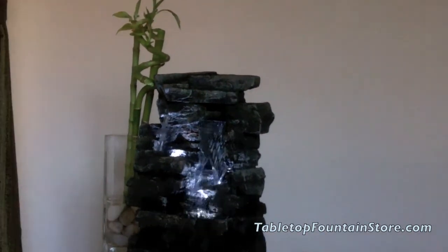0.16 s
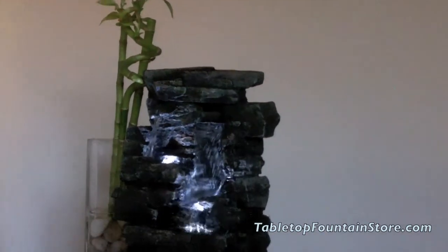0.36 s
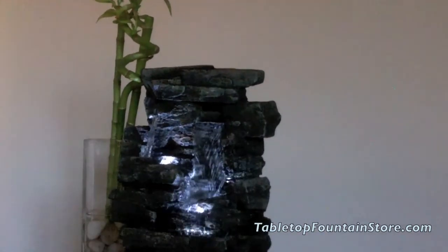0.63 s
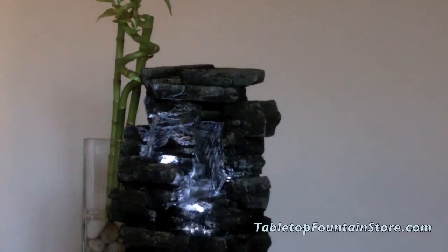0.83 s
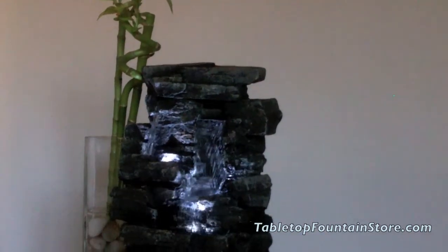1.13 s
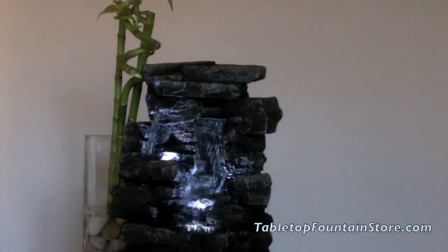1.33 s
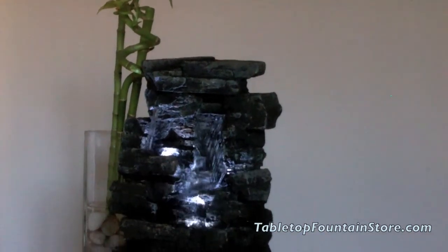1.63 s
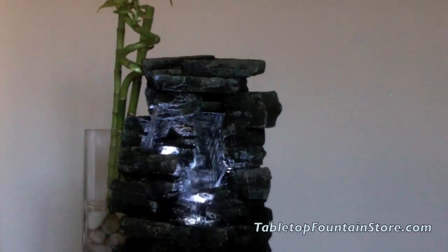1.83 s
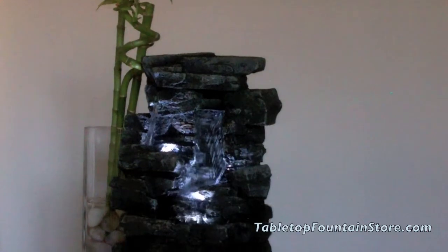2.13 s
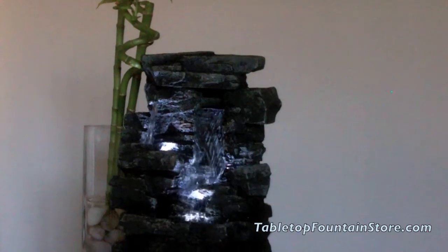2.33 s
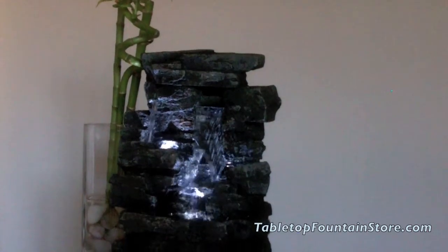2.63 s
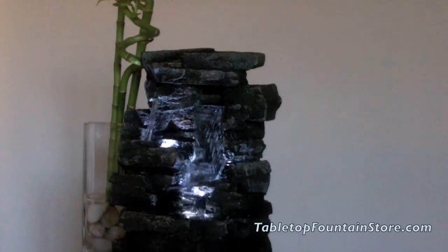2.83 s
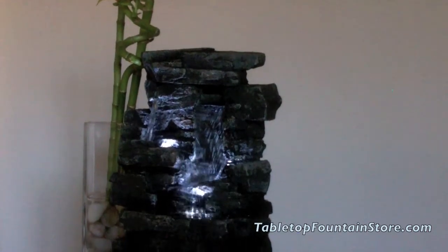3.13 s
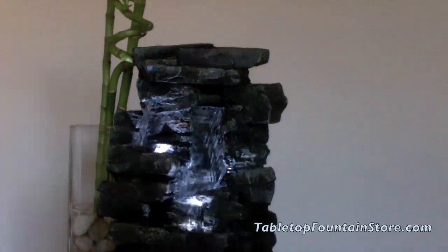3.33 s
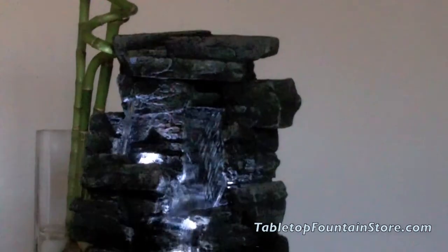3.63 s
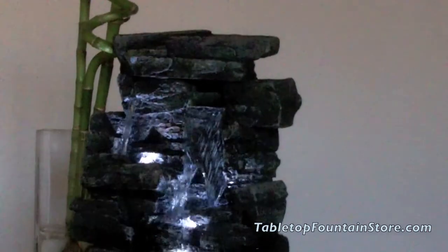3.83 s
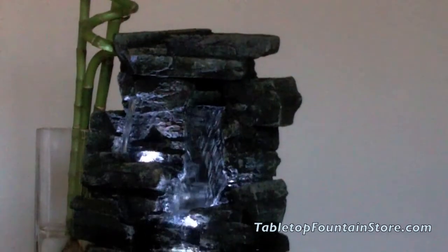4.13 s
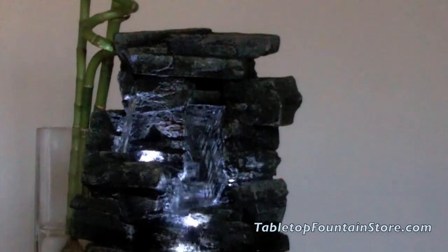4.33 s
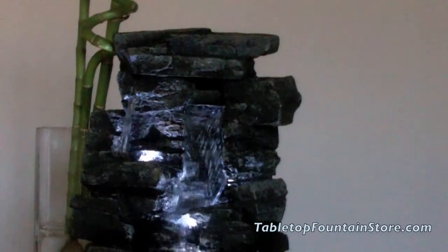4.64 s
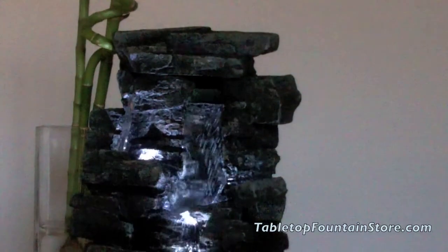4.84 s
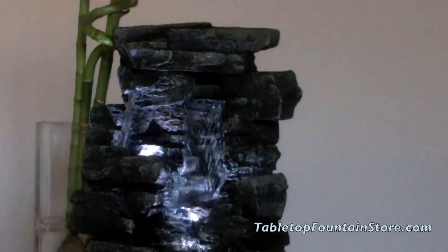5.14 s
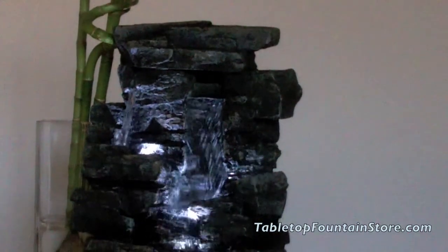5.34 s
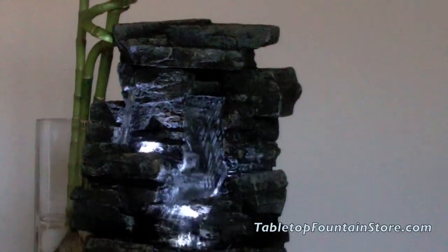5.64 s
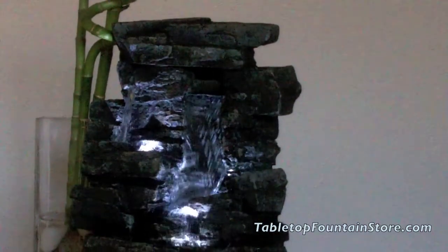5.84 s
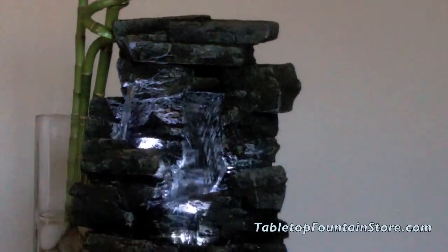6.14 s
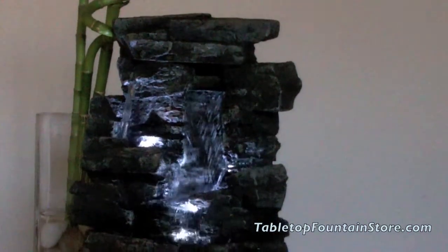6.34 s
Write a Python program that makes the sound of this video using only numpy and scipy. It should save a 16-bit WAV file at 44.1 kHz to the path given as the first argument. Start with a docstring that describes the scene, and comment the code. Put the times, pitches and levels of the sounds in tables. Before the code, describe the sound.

A small stone tabletop fountain is already running in a quiet room, heard close, centred and almost mono, with a faint short room tail. A soft, continuous trickle of small gurgles and fine fizz sits over a deep pump hum whose throb is strong at first, dips near 0.8 s, then swells and fades repeatedly. Drops plop with round, hollow tones and high droplets tick on wet stone throughout. A short splash comes around 0.2 s, a weak one at 1.0, a livelier, crisper cluster from 2.2 to 2.8, then frequent bubbly splashes from 3.3 to 5.4. Dry plastic handling knocks cut in close to the microphone: a faint one at 0.55, a solid thump at 1.7, a short click at 3.2, a duller knock at 3.7 and a hard double knock at 5.6. Afterwards calmer trickling and hum continue until the end, without resolving.

```python
"""From the start a small tabletop fountain trickles down stone tiers in a quiet room, over its pump's hum.
The film of water is clouds of ringing bubbles on noise; the pump is sines, its deep throb swelling and fading.
Drops plop and droplets spatter at once: bubble tones behind bursts of noise. Short splashes of bubbles and
spray come before 0.3 s, at 1 s, from 2.2 to 2.8 s and from 3.3 to 5.4 s. Dry knocks, as of a plastic housing
being handled, sound close by from 0.5 s on (noise cracks and modes); the last two come together near 5.6 s."""
import sys
import numpy as np
from scipy import signal
from scipy.fft import rfft, irfft
from scipy.io import wavfile

SR = 44100
rng = np.random.default_rng(int(sys.argv[2]) if len(sys.argv) > 2 else 0)


def master_out(mix):
    """Clip the mix to full scale and print it as 16-bit PCM to the path in sys.argv[1]."""
    frames = np.transpose(np.atleast_2d(mix))
    ceiling = np.clip(frames, -1, 1)
    pcm = np.round(ceiling * 32767).astype(np.int16)
    wavfile.write(sys.argv[1], SR, pcm)


N = 285325   # samples


def from_db(db):
    """Level to amplitude: 20 dB is a factor of ten."""
    return 10 ** (np.asarray(db) / 20)


def rms_one(x):
    """Normalization to unit root-mean-square."""
    return x / np.sqrt(np.mean(x ** 2) + 1e-20)


def decay(t, t60_s):
    """Exponential decay: the amplitude falls by 60 dB in t60_s."""
    return np.exp(-np.log(1000) * t / t60_s)


def add(out, start_s, sound):
    """Superposition: mix a short sound in at its start time."""
    at = int(np.clip(round(start_s * SR), 0, N - 1))
    out[at:at + len(sound)] += sound[:N - at]


def drift(rate_hz):
    """Low-passed random fluctuation with unit rms."""
    step, settling = 40, 2000   # samples per slow value; slow values discarded
    pole = np.exp(-2 * np.pi * rate_hz * step / SR)
    noise = rng.standard_normal(N // step + settling + 2)
    slow = signal.lfilter([1], [1, -2 * pole, pole * pole], noise)[settling:]
    return np.interp(np.arange(N) / step, np.arange(len(slow)), rms_one(slow))


def colour(x, spectrum, size=2048):
    """Minimum-phase filtering: the cepstrum gives a causal response; white noise keeps its level."""
    hz, db = np.transpose(spectrum)
    bins_hz = np.maximum(np.arange(size // 2 + 1) * SR / size, 1)
    bass_cut = np.minimum(bins_hz / hz[0], 1) ** 2
    gain = bass_cut * from_db(np.interp(np.log(bins_hz), np.log(hz), db))
    cepstrum = irfft(np.log(gain))
    response = irfft(np.exp(rfft(2 * cepstrum[:size // 2], size)))
    return signal.fftconvolve(x, response / np.linalg.norm(response))[:N]


def bubble(hz, cycles, rise):
    """Bubble resonance: it decays 60 dB in so many cycles, its pitch rising as it nears the surface."""
    age = np.arange(int(cycles / hz * SR) + 2) * hz / SR / cycles   # 1 at -60 dB
    return np.sin(2 * np.pi * cycles * age * (1 + rise * age / 2)) * decay(age, 1)


def burst(t60_s, size=4096):
    """Impact noise: rough pressure that decays exponentially."""
    return rng.standard_normal(size) * decay(np.arange(size) / SR, t60_s)


def bubble_cloud(per_s, low_hz, high_hz, cycles, spread_db, count=14000):
    """Random superposition of bubbles of all sizes in a range; about equal power per Hz, rms 1."""
    out, draws = np.zeros(N), rng.random((count, 5))
    born = draws[:, 1] < per_s * N / SR / count
    for when, _, pitch, strength, damping in draws[born]:
        hz = low_hz * (high_hz / low_hz) ** pitch
        size = from_db(spread_db * min(-np.log(1 - strength), 3.0))
        add(out, when * N / SR, size * hz * bubble(hz, cycles * (.5 + damping), rise=0.11))
    return rms_one(out)


# spectrum of the room's low background: f/Hz, relative level/dB
RUMBLE_SPECTRUM = [(8, -4.5), (22, 3), (35, -1.5), (60, -10), (110, -13.5), (135, -23.5), (230, -23.5),
                   (450, -33.5), (700, -41), (1200, -63.5)]


def rumble():
    """Ambient noise: low-frequency random pressure in the room."""
    return from_db(-39.5) * colour(rng.standard_normal(N), RUMBLE_SPECTRUM, size=16384)


# the rotor's overtones and the mains hum: f/Hz, rms level/dB
PUMP_LINES = [(35.86, -54), (53.8, -42), (58.4, -46), (73.9, -71), (89.6, -62.5), (107.5, -58.5),
              (116.8, -56), (120, -63.5), (161.3, -61.5)]
# swelling and fading of the rotor's deep throb: t/s, rms level/dB
THROB_LEVELS = [(0.0, -24), (0.07, -24), (0.68, -31.5), (0.81, -48), (0.88, -33.5), (1.35, -25.5),
                (2.05, -26.5), (2.18, -32.5), (2.58, -32), (3.35, -25), (4.42, -34.5), (4.5, -27.5),
                (5.26, -25), (5.77, -33), (6.43, -26.5), (6.47, -27)]
ROTOR_HZ = 17.93


def pump():
    """Periodic excitation: a throb below hearing; overtones beat with mains hum and waver with the load."""
    t = np.arange(N) / SR
    throb = from_db(np.interp(t, *np.transpose(THROB_LEVELS))) * np.sin(2 * np.pi * ROTOR_HZ * t)
    hum = np.zeros(N)
    for hz, db in PUMP_LINES:
        phase = 2 * np.pi * (hz * t + rng.random()) + 0.2 * drift(1.28)
        hum += from_db(db + 1.11 * drift(1.26)) * np.sin(phase)
    return np.sqrt(2) * (throb + hum)   # rms to peak


# knocks and clicks on the housing: t/s, crack level/dB, crack t60/s, thump level/dB, clack level/dB
KNOCK_EVENTS = [(0.545, -46.5, .024, -35, -37), (1.7356, -26.5, 0.034, -24.5, -28),
                (3.16, -29.5, 0.0053, -66, -58), (3.6868, -29, 0.023, -32, -41),
                (5.62, -40.5, 0.017, -66, -40), (5.6351, -28.5, 0.019, -25.5, -25)]
# modes of the housing: f/Hz, relative level/dB, t60/s
HOUSING_MODES = [(360, -1.5, 0.089), (386, -7.5, 0.12), (431, -4.5, 0.047), (857, -6, 0.041),
                 (1310, 11, 0.01), (1500, -4, 0.033), (1590, -8, 0.016), (2270, -3.5, 0.032),
                 (5600, 6.5, 0.0084)]
# spectrum of the crack: f/Hz, relative level/dB
CRACK_SPECTRUM = [(220, 10.5), (700, 5.5), (1500, 11.5), (2600, 1.5), (4000, -2), (6000, 4.5), (9000, 0.5),
                  (12500, -10), (16000, -25)]


def knocks():
    """Modal excitation: a crack sets the housing ringing; its panel thumps, its stiffer parts clack."""
    cracks, body, t = np.zeros(N), np.zeros(N), np.arange(SR // 4) / SR
    onset = 1 - np.exp(-t / 0.0021)
    for start_s, crack_db, crack_t60_s, thump_db, clack_db in KNOCK_EVENTS:
        add(cracks, start_s, from_db(crack_db) * burst(crack_t60_s))
        for k, (hz, db, t60_s) in enumerate(HOUSING_MODES):
            swing = (-1) ** k * np.sin(2 * np.pi * hz * t) * onset   # signs alternate
            blow_db = thump_db if hz < 500 else clack_db
            add(body, start_s, from_db(blow_db + db) * swing * decay(t, t60_s))
    return body + colour(cracks, CRACK_SPECTRUM)


# spectrum of the steady film of water: f/Hz, relative level/dB
TRICKLE_SPECTRUM = [(300, 1.5), (500, 6.5), (720, 2), (1000, -6.5), (1250, -8), (1600, 0.5), (2100, -7.5),
                    (2900, -10.5), (3700, -13.5), (5200, -13), (7800, -15.5), (10000, -21.5), (12500, -21),
                    (15500, -38)]


def trickle():
    """Bubble acoustics of an unbroken film: small gurgles and fine fizz on a soft wash of noise."""
    gurgle = bubble_cloud(per_s=260, low_hz=442.7, high_hz=3946, cycles=25.5, spread_db=4.0)
    fizz = bubble_cloud(per_s=1200, low_hz=4280, high_hz=15400, cycles=69, spread_db=9.5)
    wash = rng.standard_normal(N)
    water = from_db(-53.5) * gurgle + from_db(-49.5) * fizz + from_db(-47.0) * wash
    flutter = from_db(1.07 * drift(20.5))
    return colour(from_db(-12.5) * water * flutter, TRICKLE_SPECTRUM)


# break-ups of the stream: t/s, length/s, spray level/dB, gurgle level/dB
SPLASH_EVENTS = [(0.177, 0.11, -55, -55), (1.016, 0.081, -58, -62), (2.242, 0.047, -53, -60),
                 (2.44, .13, -53.5, -49.5), (2.678, .09, -52, -57), (3.33, 0.26, -58.5, -59),
                 (3.889, 0.074, -54, -53), (4.566, .1, -56, -57), (4.78, 0.098, -55, -58),
                 (5.022, .15, -56, -50.5), (5.241, 0.13, -60, -57.5)]
SPLASH_ATTACK_S, SPLASH_RELEASE_S = .015, .025
CALM_SPRAY_DB, CALM_GURGLE_DB = -64, -61   # floor between splashes


def stream():
    """Amplitude envelopes of spray and gurgle: each splash swells, holds and dies into the calm flow."""
    t = np.arange(N) / SR
    spray, gurgle = np.full(N, from_db(CALM_SPRAY_DB)), np.full(N, from_db(CALM_GURGLE_DB))
    for start_s, length_s, spray_db, gurgle_db in SPLASH_EVENTS:
        attack = np.clip((t - start_s) / SPLASH_ATTACK_S + 1, 0, 1)   # full at start_s
        release = np.exp(-np.clip(t - start_s - length_s, 0, 1) / SPLASH_RELEASE_S)
        spray = np.maximum(spray, from_db(spray_db) * attack * release)
        gurgle = np.maximum(gurgle, from_db(gurgle_db) * attack * release)
    return spray, gurgle


# spectrum of the broken stream: f/Hz, relative level/dB
SPRAY_SPECTRUM = [(300, -38), (600, 7), (830, 9), (1100, -4.5), (1650, 1.5), (2300, -6), (3000, 4.5),
                  (3700, -9), (5000, -7), (6200, -7), (7700, 1.5), (9500, -3.5), (12000, -16), (15500, -41)]


def splashing(spray_gain, gurgle_gain):
    """Air entrainment: where the stream breaks up it throws clumps of bubbles and fine spray."""
    gurgle = bubble_cloud(per_s=200, low_hz=590, high_hz=3490, cycles=83, spread_db=-0.5)
    fizz = bubble_cloud(per_s=800, low_hz=4800, high_hz=13000, cycles=42, spread_db=5.5)
    # specks of water land at random, 250 per second, each a puff of hiss about a millisecond long
    specks = (rng.random(N) < 250 / SR) * from_db(25 * rng.random(N))
    puffs = signal.lfilter([1], [1, -np.exp(-1 / (0.00068 * SR))], specks + 1e-18)
    mist = rms_one(rng.standard_normal(N) * puffs)
    flutter = from_db(4.62 * drift(24.3))
    spray = (from_db(-5) * fizz + from_db(-7) * mist) * flutter
    return colour(from_db(-13.5) * gurgle_gain * gurgle + spray_gain * spray, SPRAY_SPECTRUM)


def scattered_drops(per_s, surge, follows, count=200):
    """Random arrivals, faster and harder as the stream surges: rows t/s, level rise/dB, pitch ratio."""
    due = np.cumsum(per_s * surge) / SR   # drops expected so far
    wait, pitch = rng.random((count, 2)).T
    at = np.searchsorted(due, np.arange(count) + wait)
    rise_db = follows * 20 * np.log10(surge[np.minimum(at, N - 1)])
    ratio = 2 ** (0.23 * (2 * pitch - 1))   # within 0.23 octave either way
    return np.transpose([at / SR, rise_db, ratio])[at < N]


# single droplets that smack on wet stone: t/s, smack level/dB, bubble f/Hz, bubble level re smack/dB
SPATTER_EVENTS = [(0.0608, -44.5, 4830, 9), (0.201, -31, 5860, -4), (0.2448, -30.5, 6200, -8),
                  (0.8982, -41, 5200, 1.5), (2.278, -27, 7560, -5.5), (2.402, -30, 7700, -2.5),
                  (2.5442, -26.5, 7600, -10), (2.6834, -36, 7640, 5), (2.7166, -23, 7793, -23),
                  (4.019, -41.5, 7318, 8), (4.6062, -29.5, 7530, 0), (4.7824, -27, 7500, -17),
                  (4.8503, -36, 7653, -3), (5.0583, -38, 6120, 4.5), (5.408, -49.5, 9100, 14.5)]
# spectrum of the smack: f/Hz, relative level/dB
SMACK_SPECTRUM = [(500, -28), (1600, 2), (3000, 1.5), (4500, -30), (6000, 8.5), (7800, 3.5), (10000, -8),
                  (15500, -29)]
# scattered droplets throughout, denser and harder in the splashes: rate and level without surge;
# the last is the share of the spray's rise in dB that they follow
DROPLETS_PER_S, DROPLET_DB, DROPLET_HZ, DROPLET_BUBBLE_DB, DROPLET_FOLLOWS = 7.8, -44, 7055, -0.5, 0.58


def spatter(surge, count=220):
    """Impact and bubble resonance: a droplet smacks on stone and pinches off a tiny, high bubble."""
    rings, smacks = np.zeros(N), np.zeros(N)
    scattered = [(start_s, DROPLET_DB + rise_db, DROPLET_HZ * ratio, DROPLET_BUBBLE_DB)
                 for start_s, rise_db, ratio in scattered_drops(DROPLETS_PER_S, surge, DROPLET_FOLLOWS)]
    droplets = list(SPATTER_EVENTS) + scattered
    for start_s, db, hz, bubble_db in droplets[:count]:
        add(smacks, start_s, from_db(db - 13.0) * burst(t60_s=0.015))
        add(rings, start_s, from_db(db + bubble_db) * bubble(hz, cycles=71, rise=0.037))
    return rings + colour(smacks, SMACK_SPECTRUM)


# single drops that plunge into the basin: t/s, bubble level/dB, bubble f/Hz, hollow level/dB
PLOP_EVENTS = [(0.06, -48, 643, -43.5), (0.084, -46, 579, -38.5), (0.182, -42, 710, -42.5),
               (0.235, -39.5, 803, -44), (1.076, -46.5, 630, -43.5), (1.186, -44, 670, -60),
               (1.345, -46, 696, -48.5), (2.23, -52, 796, -43), (2.398, -42, 804, -48),
               (2.434, -40.5, 810, -48), (2.459, -38, 880, -37), (2.505, -34.5, 810, -41.5),
               (2.718, -55, 551, -44.5), (2.755, -45, 564, -42.5), (3.561, -40.5, 770, -40),
               (3.888, -36.5, 803, -48), (4.607, -42.5, 756, -45), (4.654, -36.5, 664.7, -50),
               (4.821, -36.5, 757, -47), (4.961, -40.5, 656, -45.5), (5.061, -44, 645.4, -40.5),
               (5.156, -45, 636, -43.5), (5.255, -44, 596, -49)]
# air resonances of the stone hollow behind the fall: f/Hz, relative level/dB, t60/s
HOLLOW_MODES = [(1573, -1.5, 0.058), (1614, -9, 0.048), (3110, -16, 0.015)]
# spectrum of the slap on the pool: f/Hz, relative level/dB
SLAP_SPECTRUM = [(700, -1.5), (1700, 0), (3000, -4), (8000, 3), (15000, -39)]
# scattered drops throughout, denser and harder in the splashes: rate and levels without surge;
# the last is the share of the gurgle's rise in dB that they follow
PLOPS_PER_S, PLOP_DB, PLOP_HZ, PLOP_HOLLOW_DB, PLOP_FOLLOWS = 8.5, -51, 700, -49.5, 0.58


def plops(surge, count=220):
    """Bubble and cavity resonance: a drop slaps the pool, rings a large bubble and sounds the hollow."""
    rings, slaps, t = np.zeros(N), np.zeros(N), np.arange(SR // 16) / SR
    scattered = [(start_s, PLOP_DB + rise_db, PLOP_HZ * ratio, PLOP_HOLLOW_DB + rise_db)
                 for start_s, rise_db, ratio in scattered_drops(PLOPS_PER_S, surge, PLOP_FOLLOWS)]
    drops = list(PLOP_EVENTS) + scattered
    for start_s, db, hz, hollow_db in drops[:count]:
        add(rings, start_s, from_db(db + 1.0) * bubble(hz, cycles=32.0, rise=0.087))
        add(slaps, start_s, from_db(hollow_db - 10.5) * burst(t60_s=0.034))
        for mode_hz, mode_db, t60_s in HOLLOW_MODES:
            # the moving water keeps changing the hollow's shape
            swing = np.sin(2 * np.pi * mode_hz * (1 + rng.normal(0, 0.0466)) * t)
            add(rings, start_s, from_db(hollow_db + mode_db) * swing * decay(t, t60_s))
    return rings + colour(slaps, SLAP_SPECTRUM)


def room(x):
    """Reverberation: a faint diffuse tail off the near walls, decaying exponentially."""
    t = np.arange(SR // 2) / SR
    tail = rng.standard_normal(len(t)) * decay(t, 0.19) * (t > .004)   # starts after 4 ms
    return signal.fftconvolve(x, tail / np.linalg.norm(tail))[:N]


def scene():
    """Superposition in the middle of the image; only a trace of rumble differs between the ears."""
    spray, gurgle = stream()
    water = trickle() + splashing(spray, gurgle)
    water += plops(gurgle / gurgle.min()) + spatter(spray / spray.min())
    handling = knocks()
    reverberation = from_db(-10) * room(water) + from_db(-17.5) * room(handling)
    mid = water + handling + reverberation + pump() + rumble()
    side = from_db(-17) * rumble()
    return np.array([mid + side, mid - side])


NOTCH_HZ, NOTCH_WIDTH_HZ, CUTOFF_HZ = 4220, 1350, 15500


def record(dry):
    """Linear filtering: the microphone has a deep notch in the upper middle; the top is cut."""
    fade_in = np.minimum(np.arange(N) / (.008 * SR), 1)
    notch = signal.iirnotch(NOTCH_HZ, NOTCH_HZ / NOTCH_WIDTH_HZ, fs=SR)
    notched = signal.lfilter(*notch, dry * fade_in)
    return signal.sosfilt(signal.ellip(10, .3, 80, CUTOFF_HZ, fs=SR, output="sos"), notched)


dry = scene()
out = record(dry)
master_out(out)
```